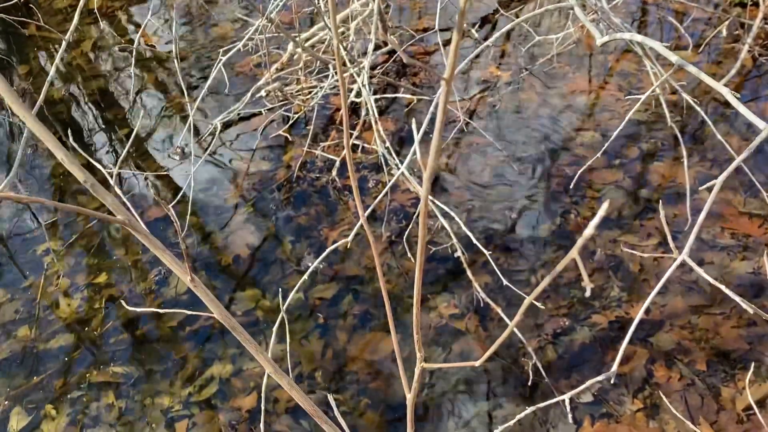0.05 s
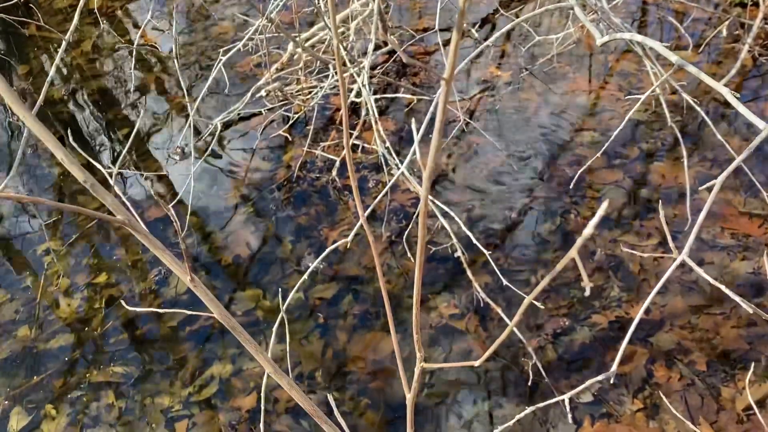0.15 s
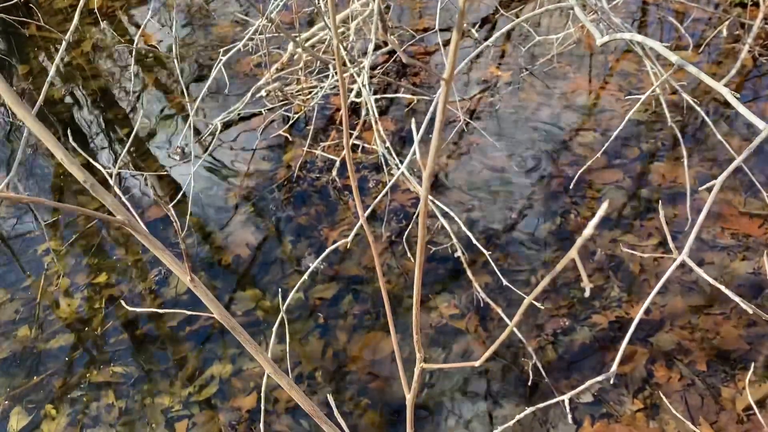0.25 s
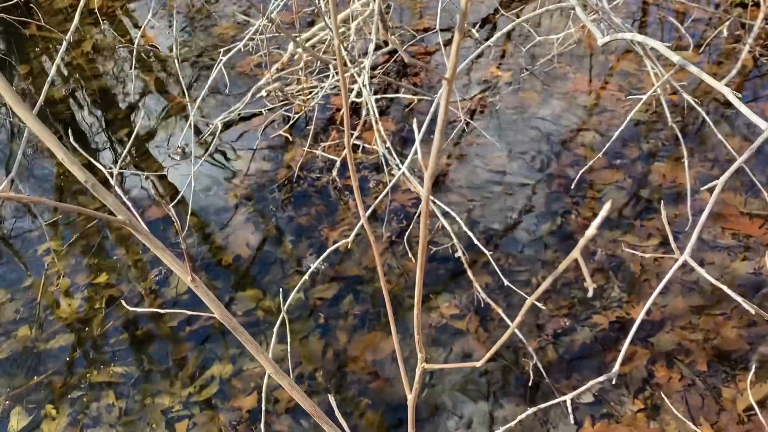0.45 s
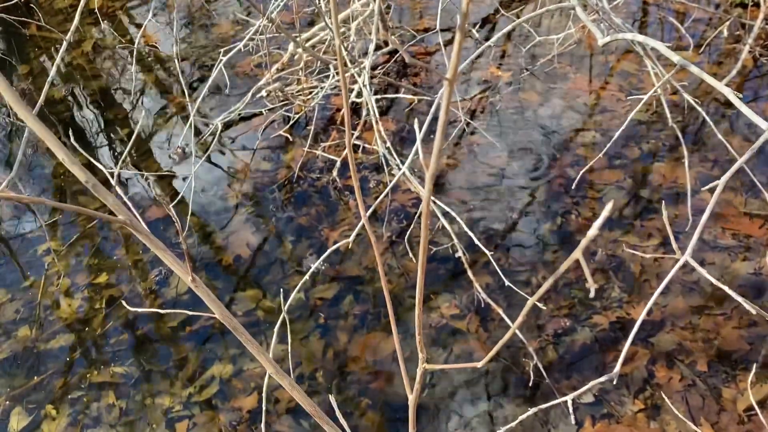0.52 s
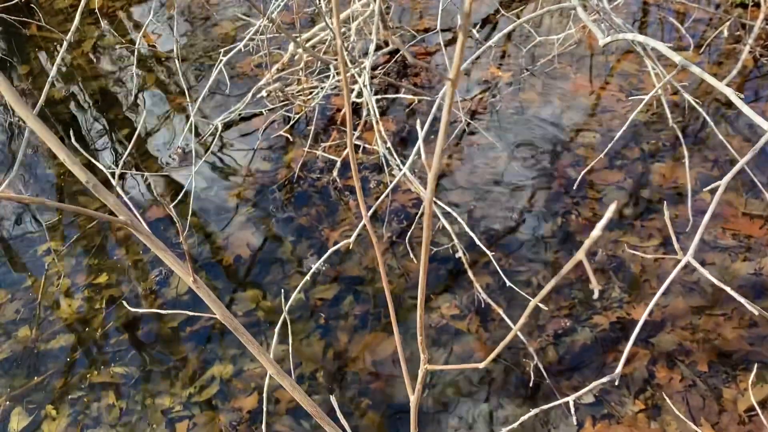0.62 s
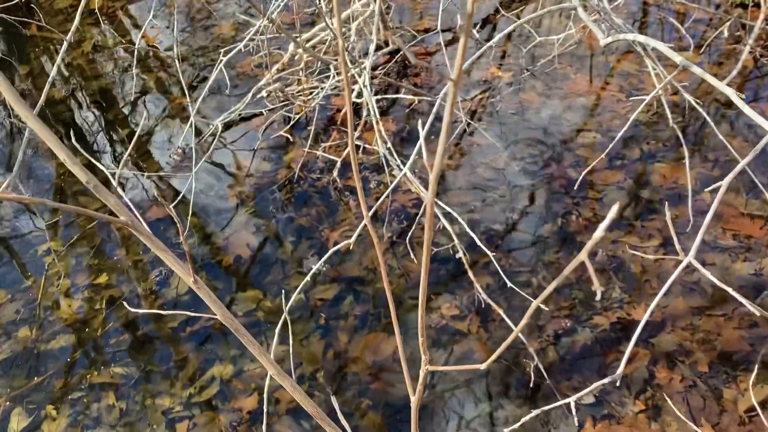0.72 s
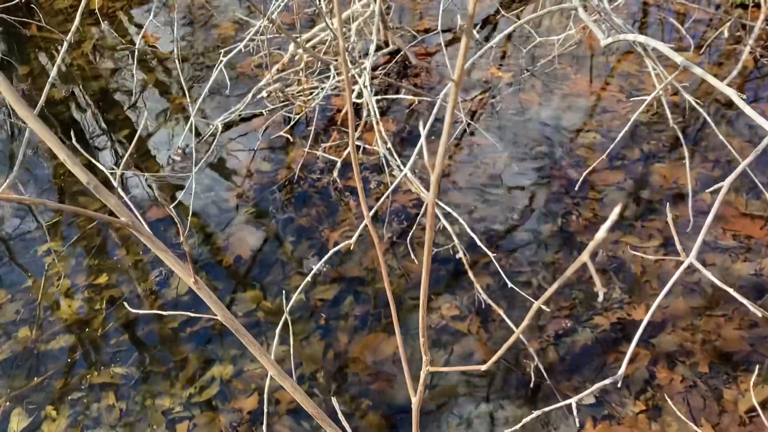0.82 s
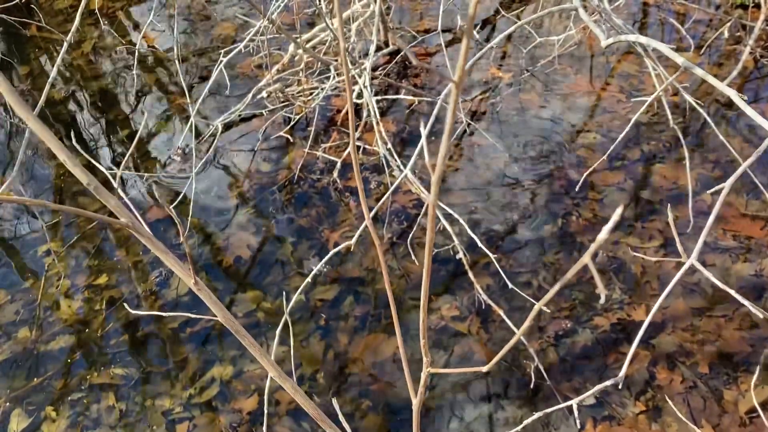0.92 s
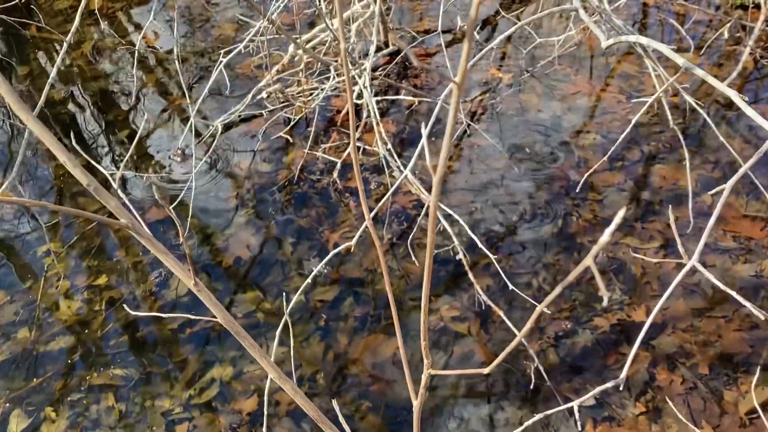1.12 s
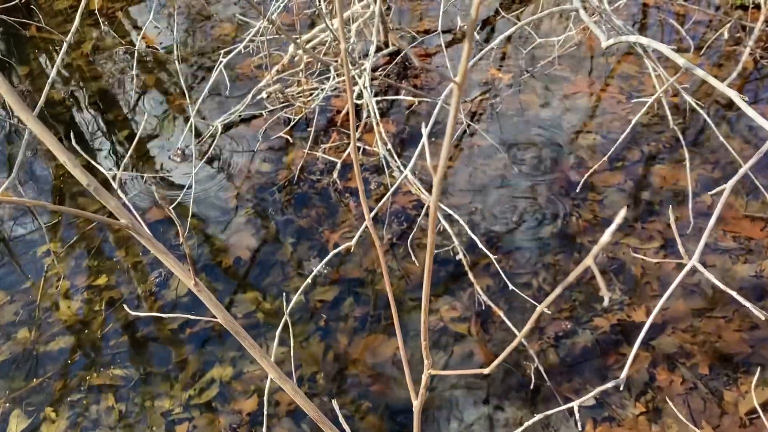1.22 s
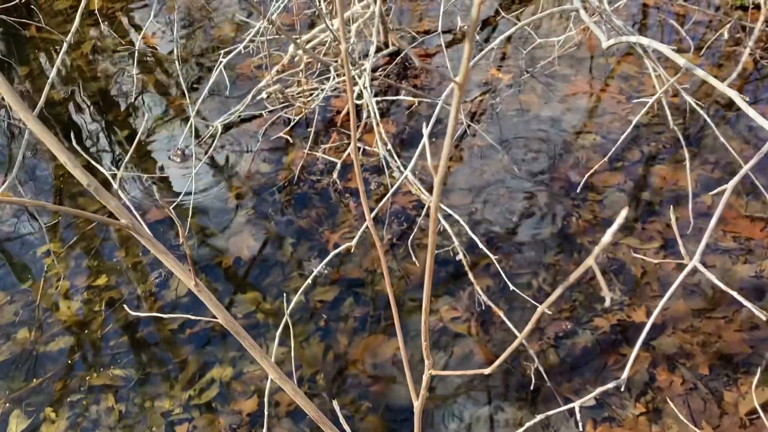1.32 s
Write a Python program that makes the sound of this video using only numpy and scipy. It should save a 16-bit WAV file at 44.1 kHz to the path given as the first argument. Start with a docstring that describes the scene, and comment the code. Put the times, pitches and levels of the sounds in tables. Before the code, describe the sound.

Several wood frogs cluck and quack in short rattling bursts at a leafy woodland pool, loudest midway, then quieter distant calls and a tiny drip-like note, over soft low background noise with slight outdoor echo.

```python
"""A low outdoor rumble, a faint hum and a blurred far chorus open on a woodland pool where wood frogs croak.
Each croak is a train of pulses that ring the vocal sacs; the rings deepen as the sacs swell, and in most near
croaks the pulses speed up. Thin bright ticks lead into near croaks, and a short clear plink sounds late.
Scattered echoes of decaying noise answer from the bank and, more faintly, from the trees."""
import sys
import numpy as np
from scipy import signal
from scipy.fft import rfft, irfft, next_fast_len
from scipy.io import wavfile
from scipy.ndimage import map_coordinates

SR = 44100
rng = np.random.default_rng(int(sys.argv[2]) if len(sys.argv) > 2 else 0)


def log_audio(samples):
    """Write samples as a 16-bit WAV file to the path given in sys.argv[1]."""
    # one column per channel
    frames = np.atleast_2d(samples).T
    # limit to full scale, then quantise
    limited = np.clip(frames, -1, 1)
    pcm = np.round(limited * 32767).astype(np.int16)
    wavfile.write(sys.argv[1], SR, pcm)


N = 59535  # samples, 1.35 s


def amp(db):
    """Decibels to gain."""
    return 10 ** (np.asarray(db) / 20)


def unit(x):
    """Scale to rms 1."""
    return x / np.sqrt(np.mean(x ** 2) + 1e-20)


def seconds(ms):
    """Milliseconds to seconds."""
    return ms / 1000


def along(points, hz):
    """Read a curve of (frequency, value) points on a log frequency axis."""
    point_hz, values = np.transpose(points)
    return np.interp(np.log(hz + 1), np.log(point_hz + 1), values)


def wobble(rate):
    """A smooth random curve with the given number of knots a second."""
    knots = rng.standard_normal(int(N * rate / SR) + 4)
    return map_coordinates(knots, [np.arange(N) * rate / SR])


def filtered(x, response):
    """Shape the spectrum of x with a gain that depends on frequency."""
    size = next_fast_len(N + SR // 2)
    spectrum = rfft(x, size) * response(np.fft.rfftfreq(size, 1 / SR))
    return irfft(spectrum, size)[..., :N]


def decay(t, t60):
    """An exponential fall of 60 dB in t60 seconds."""
    return np.exp(-np.log(1000) * t / t60)


def haze(spectrum, side_db):
    """Stereo noise of rms 1: a shared mid and an opposed side of the same colour."""
    mid, side = filtered(rng.standard_normal((2, N)), lambda hz: amp(along(spectrum, hz)))
    return unit(np.array([mid + amp(side_db) * side, mid - amp(side_db) * side]))


# Colour of the low outdoor rumble: frequency_hz, relative_density_db (dB per Hz)
RUMBLE_COLOUR = [(20, -49.5), (30, -22), (45, -5.5), (74, -2.5), (100, -12), (150, -21), (300, -30),
                 (900, -56.5)]
# Slow swells of the rumble: time_s, level_db
RUMBLE_SWELLS = [(0, -64), (.22, -60.5), (0.321, -66.5), (.56, -59.5), (.68, -59), (.85, -63.5),
                 (1.051, -65.5), (1.199, -60.5), (1.35, -57)]


def rumble():
    """Low noise, nearly the same in both channels, that swells and sinks."""
    level_db = np.interp(np.arange(N) / SR, *np.transpose(RUMBLE_SWELLS))
    return amp(level_db) * haze(RUMBLE_COLOUR, side_db=-15.5)


HUM_HZ, HUM_DB = 119.4, -76


def hum():
    """A faint low sine whose level and phase drift."""
    phase = 2 * np.pi * HUM_HZ * np.arange(N) / SR + 0.5 * wobble(6.5)
    return amp(HUM_DB + 1.3 * wobble(7)) * unit(np.sin(phase))


# Colour of the blurred far chorus: frequency_hz, relative_density_db (dB per Hz)
CHORUS_COLOUR = [(150, -28.5), (300, -28), (480, -13), (760, 2.5), (1100, -6), (1750, -1.5), (2500, -13.5),
                 (4000, -31), (6000, -40), (9000, -48.5), (15000, -49.5)]
CHORUS_DB = -53.5


def far_chorus():
    """Many far voices blur into wide, gently flickering noise."""
    return amp(CHORUS_DB + 0.5 * wobble(27)) * haze(CHORUS_COLOUR, side_db=0.5)


def background():
    """The chorus bed under rumble and hum, which are 2 dB stronger on the right."""
    return far_chorus() + (rumble() + hum()) * amp([[-1], [1]])


ATTACK_S = 0.0005  # time constant of each ring's and puff's onset


def ring(t, hz, t60):
    """A resonance that swells quickly and dies."""
    return np.sin(2 * np.pi * hz * t) * decay(t, t60) * (1 - np.exp(-t / ATTACK_S))


SETTLE = 0.3  # share of the surplus gap that is left after each pulse
SIZE_SCATTER_DB, RING_SCATTER = 1, 0.03  # spread of pulse level, and of tuning as a fraction


def pulse_train(length_ms, first_ms, settled_ms, count=20):
    """Pulse times (ms, a column) whose gaps settle, and a random size and tuning for each pulse."""
    gaps = settled_ms + (first_ms - settled_ms) * SETTLE ** np.arange(count)
    ms = np.cumsum(gaps) - gaps
    size, tuning = rng.standard_normal((2, count, 1))
    keep = ms < length_ms
    return ms[keep, None], amp(SIZE_SCATTER_DB * size[keep]), 1 + RING_SCATTER * tuning[keep]


JITTER_S = 0.00009  # spread of pulse timing


def clock(start_s, ms, delay_ms, size=900):
    """Sample positions of each pulse, and the time since it reached each ear."""
    at = start_s + seconds(ms) + JITTER_S * rng.standard_normal(ms.shape)
    index = (at * SR).astype(int) + np.arange(size) - 10
    ears = seconds(delay_ms) * np.array([-0.5, 0.5])[:, None, None]  # a positive delay makes the right ear late
    return index, np.maximum(index / SR - at - ears, 0)


def laid(index, pulses):
    """Sum the pulses into a stereo track."""
    places = np.maximum(index, 0).ravel()
    return np.array([np.bincount(places, ear.ravel(), N)[:N] for ear in pulses])


# Colour of the noise as the larynx opens: frequency_hz, relative_density_db (dB per Hz)
RASP_COLOUR = [(800, -14), (2500, 9.5), (5300, -5.5), (6500, -28), (8500, -40.5), (15000, -39)]
RASP_T60 = 0.0088  # s


def rasp(index, t):
    """A puff of rough noise with each pulse."""
    white = rng.standard_normal(N // 4)
    colour = amp(along(RASP_COLOUR, np.fft.rfftfreq(len(white), 1 / SR)))
    noise = unit(irfft(rfft(white) * colour))
    return noise[index % len(noise)] * decay(t, RASP_T60) * (1 - np.exp(-t / ATTACK_S))


SAC_T60, LOW_HZ, LOW_T60 = 0.0073, 868, 0.0074  # decays in s
SAG, LOW_SAG = 0.08, 0.16  # fraction by which the sac and low rings sink over one croak
LOW_GROWS_DB = 7  # gain of the low ring over one croak
RASP_DB = -32.5  # before the overtone gain
# Upper rings of the sac: frequency_hz, level_db (before the overtone gain), t60_s
OVERTONES = [(2510, -23, 0.0053), (3096, -22, 0.004), (3700, -30.5, 0.0025), (5090, -32.5, 0.0049)]


def croak(start_s, length_ms, level_db, rise_ms, rise_db, hold_ms, fall_db, first_ms, settled_ms,
          sac_hz, low_db, overtone_db, delay_ms, pan_db):
    """Pulses ring the swelling sacs: the rings sink and the low one gains on the main one."""
    ms, size, tuning = pulse_train(length_ms, first_ms, settled_ms)
    index, t = clock(start_s, ms, delay_ms)
    swell = ms / length_ms - 0.5
    corners_ms = [0, rise_ms, rise_ms + hold_ms, length_ms]
    effort_db = level_db - np.interp(ms, corners_ms, [rise_db, 0, 0, fall_db])
    sac = ring(t, sac_hz * tuning * (1 - SAG * swell), SAC_T60)
    low = ring(t, LOW_HZ * tuning * (1 - LOW_SAG * swell), LOW_T60)
    low = amp(low_db + LOW_GROWS_DB * swell) * low
    upper = sum(amp(db) * ring(t, hz * tuning, t60) for hz, db, t60 in OVERTONES)
    bright = amp(overtone_db) * (amp(RASP_DB) * rasp(index, t) - upper)
    pulses = 2 * amp(effort_db) * size * (sac - low + bright)
    return laid(index, pulses) * amp([[pan_db / 2], [-pan_db / 2]])


def echo(x, decay_times):
    """A diffuse noise tail for each ear; each frequency dies at its own speed."""
    hz, t, z = signal.stft(rng.standard_normal((2, SR // 2)), SR, nperseg=256)
    dying = z * decay(t, along(decay_times, hz)[:, None])
    tail = signal.istft(dying, SR, nperseg=256)[1]
    return signal.fftconvolve(x, tail / np.linalg.norm(tail[0]), axes=1)[:, :N]


# How long the bank's scatter lasts: frequency_hz, t60_s
BANK_DECAY = [(500, 0.042), (2000, 0.07), (8000, 0.09)]
BANK_DB = -3  # for the near sounds


def bank(x, db):
    """Add the short scatter of the bank, drawn afresh for each spot in the pool."""
    return x + amp(db) * echo(x, BANK_DECAY)


# Frogs across the pool: start_s, length_ms, level_db (relative), pulse_gap_ms, sac_hz
FAR_CROAKS = [(.031, 20, -59, 3.1, 1500), (.116, 20, -40.5, 2.3, 1500), (.149, 17, -40.5, 4, 1590),
              (.195, 32, -42, 3.1, 1630), (.714, 28, -38.5, 3.0, 2220), (1.031, 28, -45, 3.45, 1850),
              (1.077, 16, -43.5, 3.1, 1570), (1.105, 35, -43, 2.6, 1793), (1.176, 26.4, -41, 3.03, 1540),
              (1.212, 26, -45, 3.0, 1830), (1.336, 12, -40.5, 2.8, 1570)]
FAR_LOW_DB, FAR_OVERTONE_DB = -2.5, 4.5
FAR_RISE_DB = 5  # depth of the rise, and of the fall that follows
FAR_BANK_DB = 4


def far_croaks():
    """Weak, evenly pulsed croaks, each peaking halfway, with more bank scatter than the near ones."""
    total = 0
    for start_s, length_ms, level_db, gap_ms, sac_hz in FAR_CROAKS:
        call = croak(start_s, length_ms, level_db, length_ms / 2, FAR_RISE_DB, 0, FAR_RISE_DB, gap_ms, gap_ms,
                     sac_hz, FAR_LOW_DB, FAR_OVERTONE_DB, delay_ms=rng.uniform(-0.089, 0.37), pan_db=0)
        total = total + bank(call, FAR_BANK_DB)
    return total


WHISTLE_T60, WHISTLE_SCATTER, TOP_RING_HZ = 0.0059, 0.019, 10760  # s, fraction, Hz
TICK_RASP_DB = -7.5  # relative to the whistle


def ticks(start_s, length_ms, gap_ms, sac_db, whistle_db, growth_db, whistle_hz, top_db):
    """Weak, evenly spaced pulses with a thin high ring grow as the frog builds pressure."""
    ms, size, tuning = pulse_train(length_ms, gap_ms, gap_ms)
    index, t = clock(start_s, ms, delay_ms=0.028)
    low = amp(-8.5) * ring(t, 950 * tuning, LOW_T60)
    sac = ring(t, 1750 * tuning, SAC_T60) - low
    scatter = 1 + WHISTLE_SCATTER * rng.standard_normal(ms.shape)
    top = amp(top_db) * ring(t, TOP_RING_HZ * scatter, WHISTLE_T60)
    whistle = ring(t, whistle_hz * scatter, WHISTLE_T60) + top
    bright = whistle + amp(TICK_RASP_DB) * rasp(index, t)
    growth = amp(growth_db * (ms / length_ms - 1))
    return laid(index, 2 * size * growth * (amp(sac_db) * sac + amp(whistle_db) * bright))


# Lead-in ticks, levels relative and reached at the end of the train:
# start_s, length_ms, gap_ms, sac_db, whistle_db, growth_db, whistle_hz, top_ring_db
TICKS = [ (.1070, 23, 3.7, -44.5, -59.5, 7, 4620, -29), (0.3526, 48.8, 3.2, -25.5, -32, 27.5, 4780, -35),
         (0.4453, 12, 10, -29, -42.5, 2.5, 5110, -31.5), (.5996, 40, 3.77, -26, -38, 12.5, 5280, -12.5),
         (0.7173, 50, 3.95, -22.5, -32, 18, 5460, -32), (.8520, 12, 4.1, -51, -52.5, 9.5, 7200, -14),
         (0.8983, 43.7, 6.8, -20, -32.5, 16, 6850, -17.5)]


def lead_in_ticks():
    """Sum the tick trains that build up pressure."""
    return sum(ticks(*row) for row in TICKS)


# Near croaks, levels relative: start_s, length_ms, level_db, rise_ms, rise_depth_db, hold_ms, fall_db,
# first_gap_ms, settled_gap_ms, sac_hz, low_ring_db, overtones_db, right_ear_delay_ms, left_minus_right_db
NEAR_CROAKS = [ (0.1663, 18, -34.5, 19, 1, 1, 9, 3.8, 3.9, 1550, -4.5, 1.5, 0.12, 1),
               (0.2316, 30.7, -19, 17.2, 2.5, 1.2, 9, 9.7, 2.8, 1516, -6, 5, 0.11, 1.5),
               (0.2651, 32.3, -31, 5.3, -1, 4.7, 9, 2.3, 2.45, 1880, 0, 12.5, 0.1, 1.5),
               (0.3107, 21, -26, 9.7, 11, 10, 9, 5.2, 5.6, 1603, -3.5, 8, 0.17, 2.5),
               (0.3913, 36.4, -20.5, 8.7, 4.5, 4.9, 9.5, 5.9, 2.33, 1653, -3, 5, 0.19, 2),
               (0.4663, 32.6, -18.5, 0.66, 2.5, 15.3, 14.5, 5.82, 2.47, 1747, -4.5, 4.5, 0.03, 2),
               (0.5401, 27.9, -25.5, 13, 13, 14, 1.5, 4.1, 3.75, 1642, -3.5, 5.5, 0.12, 0.5),
               (0.6314, 26.8, -14.5, 3.8, -1, 7, 15, 5.0, 2.35, 1691, -6.5, 5.5, 0.15, 1),
               (0.6771, 29.3, -28, 11, 7.5, 4.4, 9, 3.24, 4.96, 1632, 3, 9.5, .08, -0.5),
               (0.7533, 25.5, -13, 3.9, 6.5, 5.6, 12, 5.0, 3.2, 1715, -9, -4, 0.039, 0),
               (0.7793, 25.9, -17, 3.5, -4, 7.4, 13, 3.12, 2.36, 1710, -2.5, 1, 0.074, -2),
               (.8460, 17.7, -31.5, 9, 6.5, 6, 1, 3.3, 3.6, 1413, -4.5, -6, 0, .5),
               (0.88, 21, -34.5, 7.8, 7, 6.2, 6.5, 3.2, 3.85, 1502, 2, 1, 0.15, 3),
               (0.9321, 21.8, -14, 1.9, -1, 1.9, 13.5, 3.973, 2.45, 1565, -11, -4.5, 0.017, 0.5),
               (0.96, 25.7, -19.5, 5.6, 0, 5.4, 19, 3.5, 2.98, 1503, -5, -4.5, 0.041, -0.5),
               (1.2519, 30, -32, 17, -0.5, 6.4, 4, 3.9, 3.25, 1506, -5, 13, 0.14, 0.5),
               (1.2916, 24, -37, 4.6, -5, 2.5, 9.5, 2.3, 2.3, 1750, -5.5, 19, 0.16, -1)]


def near_croaks():
    """Near croaks, each with its own bank scatter."""
    return sum(bank(croak(*row), BANK_DB) for row in NEAR_CROAKS)


PLINK_S, PLINK_HZ, PLINK_T60, PLINK_DB = 1.2922, 1730, 0.06, -34  # start and decay in s


def plink():
    """A short clear note that dies away, like a drip."""
    t = np.maximum(np.arange(N) / SR - PLINK_S, 0)
    return amp(PLINK_DB) * ring(t, PLINK_HZ, PLINK_T60)


# How long the answer of the trees lasts: frequency_hz, t60_s
TREES_DECAY = [(500, 0.28), (2000, 0.51), (5000, 0.6), (10000, 0.22)]
TREES_DB = -19
# How well the frogs radiate: frequency_hz, gain_db
RADIATED = [(200, 6), (420, -6), (650, 0), (1000, -0.5), (1350, 1), (1900, 0), (3000, -0.5), (5500, -2),
            (8000, -1.5), (11000, -0.5), (15000, -3)]
LOW_CUT_HZ = 534


def frogs():
    """All calls and the plink with the answer of bank and trees; small sacs radiate little bass."""
    calls = far_croaks() + bank(lead_in_ticks() + plink(), BANK_DB) + near_croaks()
    answered = calls + amp(TREES_DB) * echo(calls, TREES_DECAY)
    voices = filtered(answered, lambda hz: amp(along(RADIATED, hz)))
    low_cut = signal.butter(N=5, Wn=LOW_CUT_HZ, btype="high", fs=SR, output="sos")
    return signal.sosfilt(low_cut, voices)


def scene():
    """The pool with its frogs."""
    return background() + frogs()


TOP_HZ = 15700


def record(dry):
    """A steep low-pass leaves almost nothing above the band limit."""
    return signal.sosfilt(signal.ellip(10, 0.1, 80, TOP_HZ, fs=SR, output="sos"), dry)


dry = scene()
out = record(dry)
log_audio(out)
```